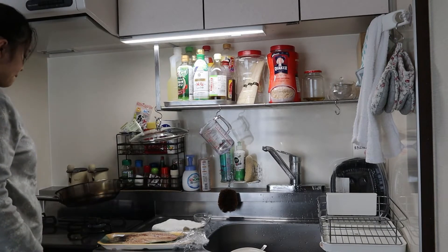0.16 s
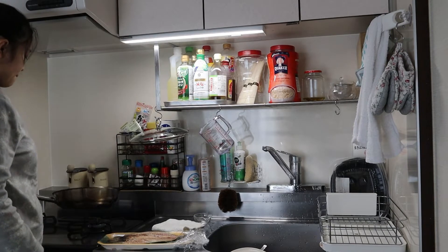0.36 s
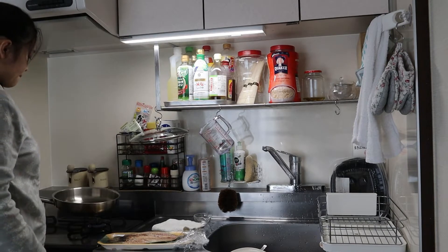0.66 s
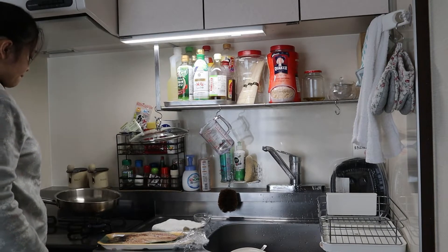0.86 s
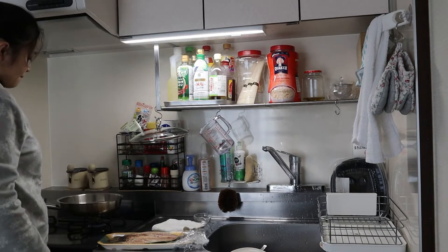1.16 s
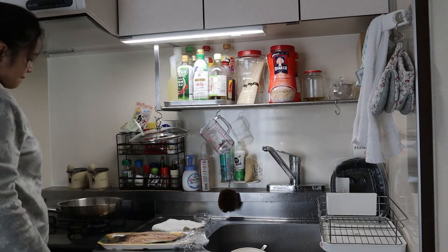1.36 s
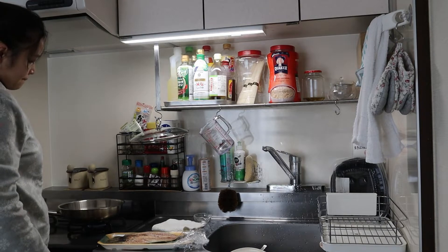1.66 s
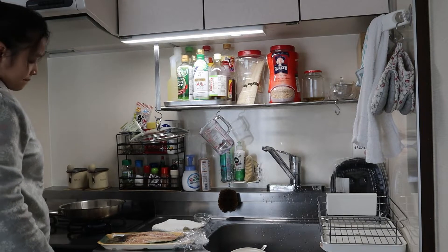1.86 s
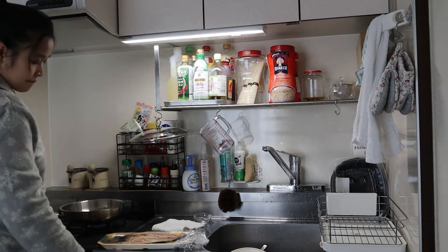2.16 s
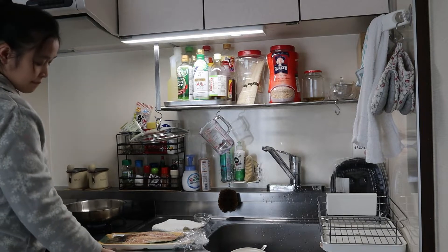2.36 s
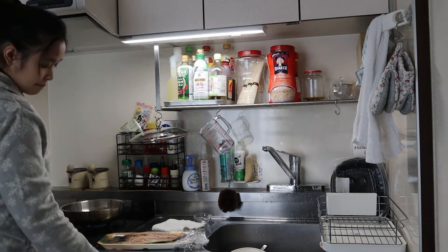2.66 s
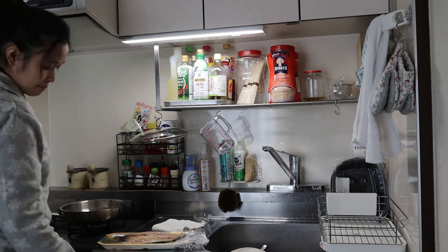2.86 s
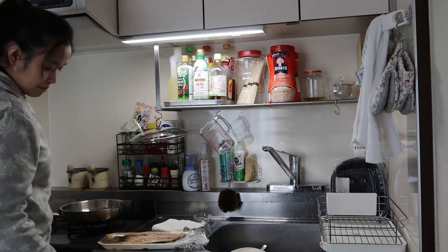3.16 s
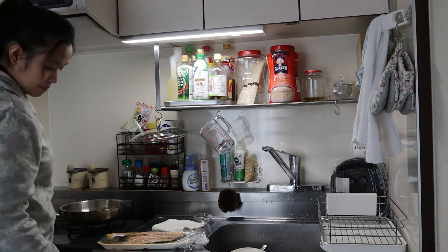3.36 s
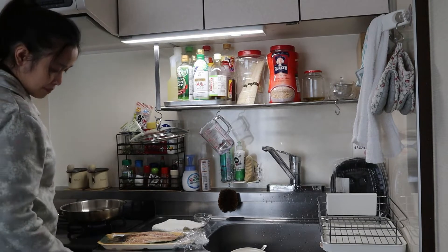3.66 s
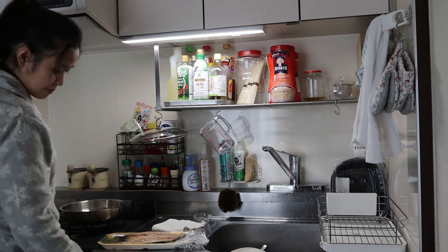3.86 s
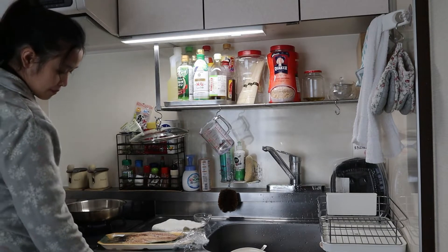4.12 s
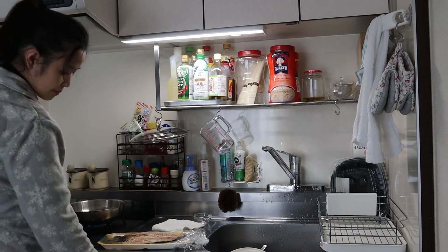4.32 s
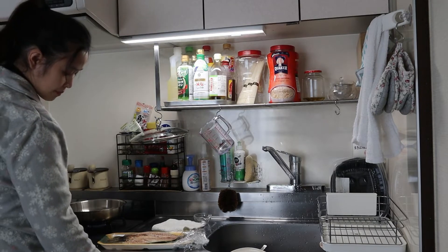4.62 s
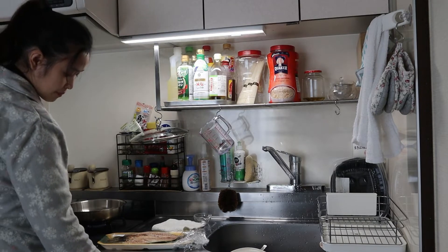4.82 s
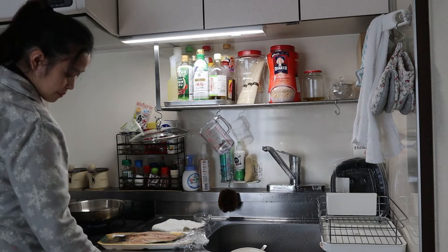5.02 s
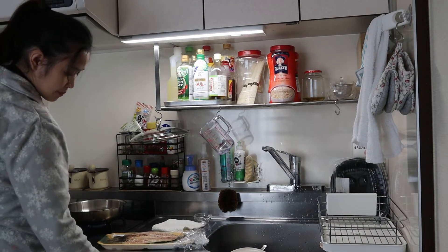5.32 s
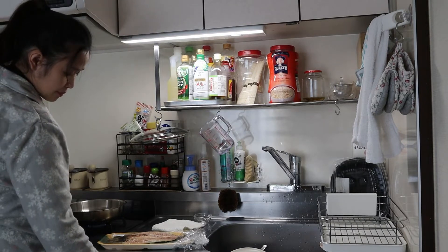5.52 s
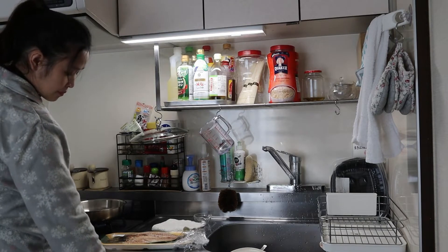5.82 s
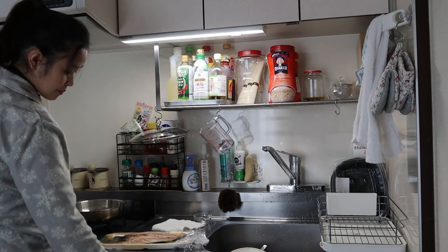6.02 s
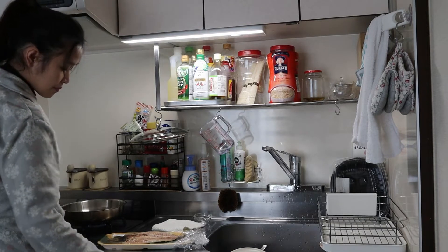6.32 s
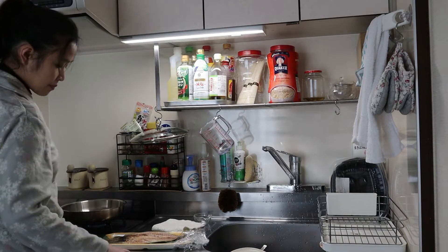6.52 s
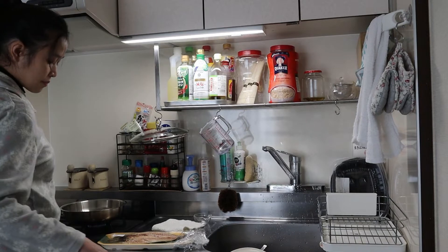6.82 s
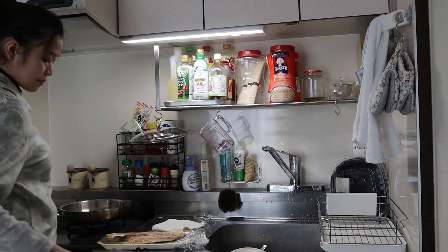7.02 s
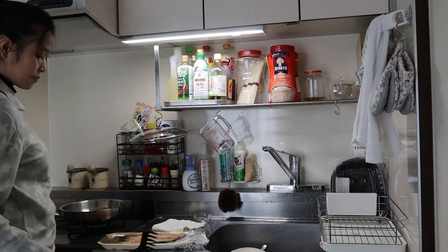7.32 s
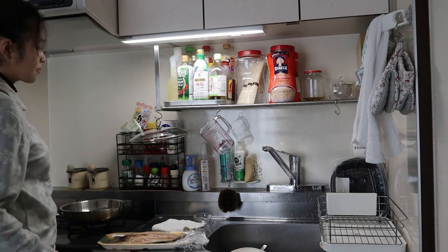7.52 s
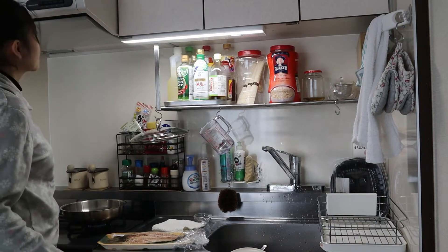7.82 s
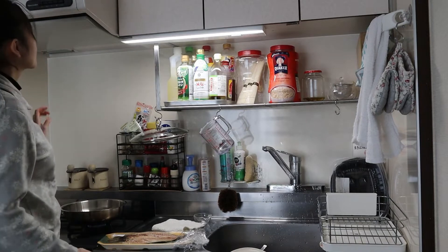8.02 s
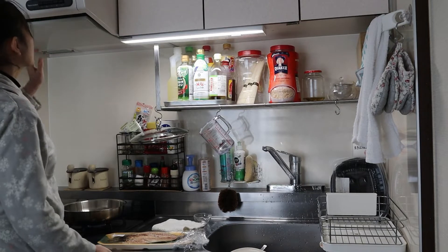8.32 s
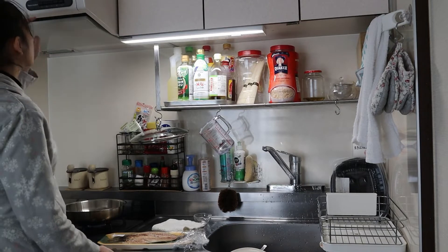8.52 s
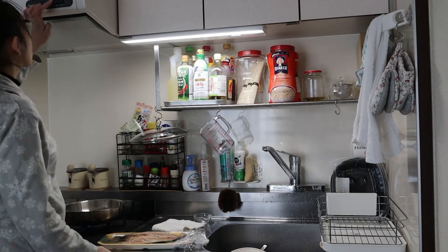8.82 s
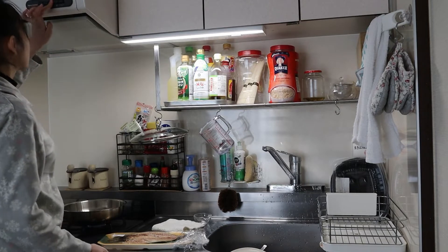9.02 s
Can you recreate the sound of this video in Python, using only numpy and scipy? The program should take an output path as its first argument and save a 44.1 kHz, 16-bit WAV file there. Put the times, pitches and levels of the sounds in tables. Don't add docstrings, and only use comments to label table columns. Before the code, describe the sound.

In a small kitchen, a steel pan clangs onto the hob, a drawer rolls open, utensils clatter about, and the drawer thumps shut.

```python
import sys
import numpy as np
from scipy import signal
from scipy.fft import rfft, irfft, next_fast_len
from scipy.io import wavfile
from scipy.ndimage import uniform_filter1d

SR = 44100
rng = np.random.default_rng(int(sys.argv[2]) if len(sys.argv) > 2 else 0)


def wav_record(signal):
    frames = np.transpose(np.atleast_2d(signal))
    bounded = np.clip(frames, -1, 1)
    quanta = np.round(bounded * 32767).astype(np.int16)
    wavfile.write(sys.argv[1], SR, quanta)


def undo_db(level):
    steps = np.asarray(level, float) / 20
    return 10 ** steps


N = 404838


def colour(x, points, turn=1):
    hz, db = np.transpose(points)
    size = next_fast_len(len(x))
    f = np.maximum(np.arange(size // 2 + 1) * SR / size, 1)
    response = undo_db(np.interp(np.log(f), np.log(np.maximum(hz, 1)), db))
    return irfft(turn * rfft(x, size) * response, size)[:len(x)]


def unit(x):
    return x / np.sqrt(np.mean(x ** 2))


def band(x, lo_hz, hi_hz):
    low_side = signal.butter(2, lo_hz, "high", fs=SR, output="sos")
    high_side = signal.butter(3, hi_hz, fs=SR, output="sos")
    return signal.sosfilt(np.vstack([low_side, high_side]), x) * np.sqrt(SR / 2 / (hi_hz - lo_hz))


def resonate(x, hz, t60):
    r, w = np.exp(-np.log(1000) / (t60 * SR)), 2 * np.pi * hz / SR
    return np.sin(w) * signal.lfilter([1], [1, -2 * r * np.cos(w), r * r], x)


def walk(rate_hz):
    k = int(SR / rate_hz)
    held = np.repeat(rng.standard_normal(N // k + 1), k)
    return uniform_filter1d(uniform_filter1d(held, k), k)[:N]


def grit(rate_hz, spread_db):
    size_db = spread_db * np.minimum(rng.exponential(size=N), 3)
    clicks = rng.random(N) < rate_hz / SR
    return unit(clicks * rng.choice([-1, 1], N) * undo_db(size_db))


def gain(spans, column):
    t = np.arange(N) / SR
    total = sum(undo_db(np.interp(t, s[:, 0], s[:, column], -120, -120)) for s in map(np.array, spans))
    return uniform_filter1d(total, size=441)


def swells(events, rise_db_s, fall_db_s):
    t = np.arange(0, N + 64, 64) / SR
    slow = 0
    for s, db, hold in events:
        early, late = np.maximum(s - t, 0), np.maximum(t - s - hold, 0)
        slow = slow + undo_db(db - rise_db_s * early - fall_db_s * late)
    return np.interp(np.arange(N) / SR, t, slow)


BODIES = ["pan", "hob", "cutlery", "ladle", "tools", "tray", "cabinet", "latch", "landing", "slam"]
BODY_RING_DB = (-11.5, -18.5, -15.5, -17, -21, -21, -8, -16.5, -11, -10)
# (thud [dB], knock [dB], edge [dB])
BODY_COLOUR_DB = [(-7, -4, -17.5), (-23, -14, -16), (-0.5, -1.5, -6.5), (-3, -1.5, -11.5), (-6.5, -1, -10),
                  (-19.5, -2, -30), (8, 4.5, -20), (13.5, -0.5, -4.5), (-18, -5.5, -14.5), (11, 2, -10)]
# (low edge [Hz], high edge [Hz])
CONTACT_BANDS = [(1460, 3070), (140, 412), (370, 1320), (4300, 10600)]
# (crack [dB], thud [dB], knock [dB], edge [dB])
CONTACT_DB = (-7.5, -5, -6, -4.5)
# (crack [dB/dB], thud [dB/dB], knock [dB/dB], edge [dB/dB])
HEFT_LIFT = (-0.073, 0.86, 0.24, -0.098)


def struck(blows, modes, body):
    which = BODIES.index(body)
    chatter_db, spot_db = -23.5, 2.0
    pair_width, pair_db, pair_ring = 0.005, -4.5, 1.06
    start = int(blows[0][0] * SR) - 200
    force = np.zeros((4, int(blows[-1][0] * SR) - start + 3 * SR // 4))
    touch = np.zeros_like(force)
    t = np.arange(SR // 2) / SR
    for s, db, heft_db, t60, knock_db in blows:
        attack = 1 - np.exp(-t / (0.075 * t60))
        fade = attack * np.exp(-np.log(1000) * t / np.clip(t60, 0.003, 0.3))
        material_db = np.array((0, *BODY_COLOUR_DB[which])) + CONTACT_DB
        level = undo_db(db + heft_db * np.array(HEFT_LIFT) + material_db + (0, 0, knock_db, 0))
        at = int(s * SR) - start
        force[:, at:at + SR // 2] += level[:, None] * fade
        touch[:, at + 44] = level * min(1, 0.1 / t60)
    force = force * rng.standard_normal(force.shape)
    contact = sum(band(f, *edges) for f, edges in zip(force, CONTACT_BANDS))

    ring, at = 0, np.flatnonzero(touch[0])
    for hz, db, t60 in modes:
        register = 1 if hz < 400 else 2 if hz < 1500 else 0 if hz < 5000 else 3
        push = undo_db(db + chatter_db) * force[register]
        spot = spot_db * rng.standard_normal(size=30)[:len(at)]
        push[at] += touch[register, at] * undo_db(db + spot)
        pair_hz = hz * (1 + pair_width * rng.uniform(0.492, 1))
        ring = ring + resonate(push, hz, t60) + undo_db(pair_db) * resonate(push, pair_hz, pair_ring * t60)
    sound = contact + undo_db(BODY_RING_DB[which]) * ring
    return np.concatenate([np.zeros(start), sound, np.zeros(N)])[:N]


# (frequency [Hz], density [dB per Hz])
HISS_SPECTRUM = [(12, -51.5), (20, -33), (59, -7.5), (111, -12), (183, -11.5), (286, -16), (319, -14),
                 (367, -17.5), (511, -21), (620, -18.5), (940, -20), (9630, -42), (15000, -54)]


def hiss():
    return unit(colour(rng.standard_normal(N), HISS_SPECTRUM)) * undo_db(-54 + 0.36 * walk(4.17))


# (frequency [Hz], rms level [dB])
MOTOR_LINES = [(59.2, -61.5), (102.3, -64.5), (2767, -69.5)]


def hum():
    turns = np.cumsum(1 + 0.0027 * walk(1.8)) / SR
    return sum(np.sqrt(2) * undo_db(db - 4.0) * np.sin(2 * np.pi * hz * turns) for hz, db in MOTOR_LINES)


# (time [s], crack [dB], heft [dB], contact t60 [s], extra knock [dB])
CABINET_BUMPS = [(0.6091, -47.5, -2, 0.028, -8), (2.347, -47, 5.5, 0.087, 5), (2.3645, -31, -16, 0.025, 0),
                 (2.4914, -42, 21, 0.014, -6), (2.7411, -37, 7, 0.022, 7), (2.7814, -53, -22, 0.063, 5),
                 (3.669, -51, 3.5, 0.036, -1), (3.9281, -45, -6, 0.021, 3), (7.299, -69, 20, 0.048, -9),
                 (7.6211, -38, -33, 0.041, -3), (7.8693, -26, 3, 0.03, -0.5),
                 (8.0189, -24.5, -3, 0.014, -11)]
# (frequency [Hz], level [dB], t60 [s])
CABINET_MODES = [(82, -15, 0.27), (103, -2.5, 0.12), (163.6, -2, 0.26), (215.3, -6, 0.22),
                 (233, -23, 0.039), (274, -4.5, 0.05), (326, -26, 0.084), (679, 0.5, 0.062)]


def cabinet():
    return struck(CABINET_BUMPS, CABINET_MODES, "cabinet")


# (frequency [Hz], t60 [s], level [dB])
ROOM_DECAY = [(59.5, 0.52, 3.5), (82.4, 0.25, 3), (123.7, 1, -1), (208, 0.37, 2), (1000, 0.46, 4),
              (3700, 0.44, 3.5), (10600, 0.14, -1.5)]


def kitchen():
    t, out = np.arange(int(0.9 * SR)) / SR, 0
    room_hz, room_t60, room_db = np.transpose(ROOM_DECAY)
    for hz in 45 * 2 ** np.arange(0, 9, 0.5):
        t60 = np.interp(np.log(hz), np.log(room_hz), room_t60)
        db = np.interp(np.log(hz), np.log(room_hz), room_db)
        share = [(hz / 1.6, -60), (hz / 1.41, -14), (hz / 1.19, -3), (hz, 0),
                 (hz * 1.19, -3), (hz * 1.41, -14), (hz * 1.6, -60)]
        noise = colour(rng.standard_normal(len(t)), share)
        out = out + undo_db(db) * noise * np.exp(-np.log(1000) * t / t60) / np.sqrt(t60)
    out = out * np.clip(t / 0.0028, 0, 1)
    return out / np.sqrt(np.sum(out ** 2))


# (time [s], crack [dB], heft [dB], contact t60 [s], extra knock [dB])
PAN_KNOCKS = [
    (1.4505, -19, -12, 0.023, -22),
    (1.4585, -19.5, -10.5, 0.0052, -16.5),
    (1.52, -35, 2.5, 0.084, 5),
    (1.59, -33, 9, 0.1, 0.5),
    (1.65, -38.5, 8.5, 0.13, -1.5),
]
# (frequency [Hz], level [dB], t60 [s])
PAN_MODES = [(208, -10, 0.55), (328, -6, .26), (710, -15, 0.44), (860, -12, 0.44), (1160, 3.5, 0.12),
             (1560, -18, .2), (2305, 3.5, 0.16), (3230, -7, .22), (3530, -8, .27), (4090, 1, 0.19),
             (4657, 1, 0.2), (5809, 4.5, 0.14), (7060, 5.5, 0.13), (8300, -24, .1)]


def pan():
    return struck(PAN_KNOCKS, PAN_MODES, "pan")


# (time [s], length [s], frequency [Hz], level [dB], glide [share of pitch])
SQUEAK_EVENTS = [
    (1.5, .2, 205, -45, 0),
    (2.36, .047, 1950, -58, 0),
    (2.74, .074, 1480, -58, 0),
    (5.72, .085, 975, -38, -.03),
    (5.72, .07, 1920, -52, -.02),
    (5.97, .035, 1250, -23, -.35),
    (6.38, .07, 1900, -47, 0),
]


def squeaks():
    out, wobble = np.zeros(N), 1 + 0.01 * walk(90)
    for s, length, hz, db, glide in SQUEAK_EVENTS:
        at = slice(int(s * SR), int(s * SR) + int(length * SR))
        size = len(out[at])
        cycles = hz * np.cumsum(wobble[at] + np.linspace(0, glide, size)) / SR
        out[at] += undo_db(db) * np.hanning(size) * np.sin(2 * np.pi * cycles)
    return out


# (time [s], level [dB], hold [s])
SLIDES = [(1.56, -46, 0.2), (1.938, -39, 0.18), (3.85, -51, 0.053), (4.128, -27.5, 0.012),
          (4.562, -44.5, 0.24), (4.95, -37.5, 0.052), (5.56, -43, .03), (5.82, -29.5, 0.073),
          (5.995, -27.5, 0.015), (6.218, -25.5, 0.0038), (6.476, -39.5, 0.0036), (8.45, -45, 0.096),
          (8.9, -50.5, 0.39)]
# (frequency [Hz], density [dB per Hz])
SLIDE_SPECTRUM = [(59, -48), (100, -12), (600, -4), (952, -6.5), (1400, -29), (1920, -16), (3000, -26.5),
                  (14000, -40.5)]


def rustle():
    ticks = unit(colour(grit(4000, spread_db=-4.0), SLIDE_SPECTRUM))
    return undo_db(-9.5) * ticks * undo_db(3.45 * walk(14)) * swells(SLIDES, rise_db_s=236.5, fall_db_s=166.5)


# (time [s], crack [dB], heft [dB], contact t60 [s], extra knock [dB])
PAN_LANDING = [
    (1.7579, -11.5, -9, 0.014, -1),
    (1.765, -8, 0, 0.012, 0),
    (1.799, -15, 13.5, 0.056, 2.5),
    (1.83, -22, 10.5, 0.026, -2),
]
# (frequency [Hz], level [dB], t60 [s])
LANDING_MODES = [(350, 5.5, 0.15), (1246, -2.5, 0.049), (1413, -14.5, 0.12), (2283, -5, 0.081),
                 (3140, -12, 0.22), (3280, 1, .14), (3670, -10, .2), (4190, 1.5, 0.16), (4450, -15.5, .3),
                 (4620, -2, 0.12), (5600, 13.5, 0.033), (6460, 1.5, 0.12), (6970, -1.5, .12),
                 (8040, -3, 0.11)]


def landing():
    return struck(PAN_LANDING, LANDING_MODES, "landing")


# (time [s], crack [dB], heft [dB], contact t60 [s], extra knock [dB])
HOB_KNOCKS = [
    (1.928, -14, -26.5, 0.055, -1),
    (1.94, 5.5, -9, 0.0051, 0.94),
    (1.945, -18.5, -6, 0.011, 0.89),
    (1.972, -18, -13, 0.097, -1),
    (2.046, -13, 5, 0.035, 0),
    (2.1, -21.5, -6, 0.025, 0.9),
]
# (frequency [Hz], level [dB], t60 [s])
HOB_MODES = [(311, 8.5, 0.14), (934, 12, 0.018), (2266, -20.5, 0.074), (5780, 5, 0.055), (3284, -2, 0.22),
             (3363, -2, 0.18), (3630, -9.5, 0.21), (4100, -6.5, 0.078), (4475, -14, 1.05),
             (4640, -7.5, 0.18), (6100, 6.5, .17), (7080, 1.5, 0.12), (7970, 3, 0.13), (12230, -0.5, 0.27)]


def hob():
    return struck(HOB_KNOCKS, HOB_MODES, "hob")


# (time [s], rumble level [dB])
DRAWER_ROLLS = [
    [(2.33, -24.5), (2.354, -38.5), (2.47, -33.5), (2.502, -26.5), (2.756, -26.5), (2.774, -25),
     (3.02, -32.5), (3.2, -59)],
    [(7.5, -52), (7.58, -46.5), (7.78, -27), (7.972, -25), (8.112, -32), (8.29, -34.5), (8.3, -23)],
]
# (frequency [Hz], width [Hz], level [dB])
DRAWER_MODES = [(81, 5, 8.5), (119, 9.8, 7), (161, 79, 11), (198, 48, -4), (220, 15, -1), (283.7, 6.3, -3),
                (350, 7.3, -35.5), (681, 440, -35)]
# (frequency [Hz], density [dB per Hz])
RAIL_SPECTRUM = [(240, -28), (400, 3), (471, -12), (644, -4.5), (1460, -13), (1880, -12.5), (11000, -30.5),
                 (14000, -43)]


def drawer():
    bumps = grit(270, spread_db=2.0)
    box = 0
    for hz, width_hz, db in DRAWER_MODES:
        box = box + undo_db(db) * unit(resonate(bumps, hz, 3.4 / max(width_hz, 8)))
    rails = colour(grit(9000, spread_db=4.5), RAIL_SPECTRUM) * undo_db(0.51 * walk(28))
    return (undo_db(-7) * unit(box) + undo_db(-23) * unit(rails)) * gain(DRAWER_ROLLS, column=1)


# (time [s], crack [dB], heft [dB], contact t60 [s], extra knock [dB])
CUTLERY_KNOCKS = [(2.9876, -26.5, 11, 0.022, -4.5), (3.0475, -57, 6, 0.054, -1),
                  (4.075, -14.5, -14, 0.032, -4), (4.1033, -18.5, -5, 0.072, 3), (4.132, -18, 6, .02, -2.5),
                  (4.139, -9, -3.5, 0.032, -1.5), (4.1978, -21.5, -2, 0.01, 7), (4.445, -32.5, -2, 0.2, 4),
                  (4.47, -21.5, -2, 0.038, -7), (4.478, -24, -1, 0.024, -1.5), (4.494, -24, 0, .04, -3),
                  (4.5114, -21, -1.5, 0.0079, -0.5)]
# (frequency [Hz], level [dB], t60 [s])
CUTLERY_MODES = [(207.8, -1, 0.15), (636, 0, 0.1), (863, 5.5, 0.06), (1070, -16, 0.066), (1797, -2, 0.053),
                 (2755, -9.5, 0.045), (4610, -12.5, 0.051), (9400, -13, 0.05), (10380, -1, 0.15),
                 (10890, 1.5, 0.22), (11040, -5.5, 0.26), (11300, -2, 0.14), (13050, -10, 0.26),
                 (13650, -12, 0.17)]


def cutlery():
    return struck(CUTLERY_KNOCKS, CUTLERY_MODES, "cutlery")


# (time [s], level [dB], hold [s])
BOARD_SHAKES = [(3.1, -30, 0.017), (3.65, -65, 0.0072), (4.11, -28.5, 0.0071), (4.52, -35, 0.011),
                (4.85, -29.5, 0.031), (5.37, -45, 0.081), (5.78, -34.5, 0.35), (6.33, -35, 0.015),
                (6.7, -40, 0.013), (7.16, -63, .01), (7.31, -31.5, 0.026), (7.6, -44, 0.011),
                (8.42, -38, 0.038), (8.55, -30, 0.44)]


def boards():
    rumble = band(rng.standard_normal(N), 58, 87)
    return undo_db(-15.5) * rumble * swells(BOARD_SHAKES, rise_db_s=174.5, fall_db_s=79)


# (time [s], crack [dB], heft [dB], contact t60 [s], extra knock [dB])
LADLE_KNOCKS = [
    (4.765, -29.5, 2, 0.15, 1),
    (4.8118, -25.5, 3, 0.11, -1.5),
    (4.8439, -10.5, -3.5, 0.023, 6.5),
    (4.8689, -27.5, 17, 0.028, -5),
    (4.9203, -7, -35, .02, -13),
    (4.9824, -10.5, -8, 0.022, -9),
]
# (frequency [Hz], level [dB], t60 [s])
LADLE_MODES = [(192, -15, 0.41), (395, -5.5, 0.25), (644, 1.5, 0.18), (800, -24, .2), (1098, 7, 0.028),
               (2910, -10, 0.062), (10000, -12, 0.053), (12240, -4, 0.08)]


def ladle():
    return struck(LADLE_KNOCKS, LADLE_MODES, "ladle")


# (time [s], crack [dB], heft [dB], contact t60 [s], extra knock [dB])
TOOL_KNOCKS = [(5.4785, -37, 17, 0.019, -5), (5.534, -29, 2, 0.052, 1.5), (5.552, -37, 13, 0.023, 6),
               (5.594, -52, -2, 0.023, -3), (5.651, -33.5, 2, 0.043, 12), (5.6982, -21.5, 3, 0.037, -1),
               (5.8049, -19, 12, 0.051, -2), (5.8235, -22.5, 12, 0.02, 1),
               (5.8325, -12.5, -21, 0.025, -0.5), (5.8658, -8, 2.5, 0.017, -1.5),
               (5.911, -16.5, 3, 0.033, 6.5), (5.93, -25, 10, 0.018, 3.5), (5.97, -17.5, 9, .02, 2.5),
               (5.979, -6.5, 5.5, 0.022, 3.5), (6.03, -28.5, -22, 0.02, 6),
               (6.1764, -17.5, 12.5, 0.051, -5.5), (6.22, -33, 3.5, 0.044, 12),
               (6.354, -20, -34, 0.015, -9), (6.3814, -21.5, 9, 0.0073, 1), (6.404, -24.5, 7, 0.054, 5),
               (6.445, -30, 0, .015, 2), (6.4728, -29, 7, 0.02, 6), (6.52, -64, 8, 0.034, 8)]
# (frequency [Hz], level [dB], t60 [s])
TOOL_MODES = [(216.5, -2, 0.31), (374.5, 6.5, 0.15), (562, -3.5, 0.56), (646, 5, 0.1), (806, -3, 0.11),
              (869, 3, 0.056), (976, -4.5, 0.06), (1110, -6, 0.058), (1890, -6, 0.12), (2257, -5, 0.051),
              (2730, -1.5, 0.042), (3017, -1.5, 0.073), (4330, 1, 0.04), (5680, 8.5, 0.019)]


def tools():
    return struck(TOOL_KNOCKS, TOOL_MODES, "tools")


# (time [s], crack [dB], heft [dB], contact t60 [s], extra knock [dB])
TRAY_KNOCKS = [
    (6.658, -9, -8, 0.04, -2),
    (6.671, -13, 0, .03, -2),
    (6.685, -13, 8, 0.035, -2),
    (6.71, -22, 16.5, 0.047, 1),
]
# (frequency [Hz], level [dB], t60 [s])
TRAY_MODES = [(163.6, 10, 0.31), (300, 9, 0.09), (1172, 1, 0.16), (1514, 13, 0.054), (1383, 8, 0.09),
              (1640, 7, 0.16), (2040, 4.5, 0.2), (2400, -6, .12), (2630, -4, 0.34), (2725, -4, 0.8),
              (3176, -7.5, 0.37), (3550, -10, 0.21), (3957, -15, 0.22), (4242, -20.5, 0.15)]


def tray():
    return struck(TRAY_KNOCKS, TRAY_MODES, "tray")


# (time [s], crack [dB], heft [dB], contact t60 [s], extra knock [dB])
SLAM_KNOCKS = [
    (8.321, -21.5, 9.2, 0.04, -1),
    (8.343, -36, 6.9, 0.023, 0),
    (8.356, -22.5, 2.7, 0.01, -5.5),
    (8.372, -25.5, 3.2, 0.025, 3.5),
    (8.39, -33, 4.7, 0.016, 0.5),
]
# (frequency [Hz], level [dB], t60 [s])
SLAM_MODES = [(66, -8, .4), (93, 1, 0.26), (169.5, -5, 0.14), (225.4, 1.5, 0.1), (297, -9, .12),
              (520.6, -2.5, 0.16), (570, -3, 0.13), (689, 3.5, 0.094), (843, -14.5, 0.15)]


def slam():
    return struck(SLAM_KNOCKS, SLAM_MODES, "slam")


# (time [s], crack [dB], heft [dB], contact t60 [s], extra knock [dB])
LATCH_CLICKS = [
    (8.7475, -37, -9, 0.027, 0.87),
    (8.796, -22.5, -16.5, 0.093, 0.85),
    (9.0589, -47, -12, 0.12, 0.86),
]
# (frequency [Hz], level [dB], t60 [s])
LATCH_MODES = [(112.3, 8, 0.71), (860, 10, 0.051), (1296, -10, 0.4), (1680, -8, 0.17), (2670, -12, 0.25),
               (3840, -18, 0.1), (6400, -26, 0.11)]


def latch():
    return struck(LATCH_CLICKS, LATCH_MODES, "latch")


# (frequency [Hz], side minus mid [dB])
PORT_DIFFERENCE = [(60, -53), (125, -28), (250, -13.5), (500, -5.5), (1000, -2), (2000, 2), (4000, 5),
                   (8000, 6.5), (14000, 2.5)]


def scene():
    dry = cabinet() + pan() + squeaks() + rustle() + landing() + hob() + drawer() + cutlery()
    dry = dry + boards() + ladle() + tools() + tray() + slam() + latch()
    dry = signal.sosfilt(signal.butter(2, 48, "high", fs=SR, output="sos"), dry)

    def port_sum(front_db):
        room = undo_db(3) * signal.fftconvolve(dry, kitchen())[:N]
        return undo_db(front_db) * (dry + room) + hiss() + hum()

    mid = port_sum(0)
    side = port_sum(-1.3)
    side = colour(side, PORT_DIFFERENCE, turn=1j - 0.25)
    return np.array([mid + side, mid - side])


def roll_off(x):
    return signal.sosfilt(signal.butter(12, 15480, fs=SR, output="sos"), x)


def record(dry):
    clipped = np.clip(dry, -1, 1)
    mix = signal.sosfilt(signal.ellip(8, 0.2, 60, 15600, fs=SR, output="sos"), clipped)
    return roll_off(mix)


dry = scene()
out = record(dry)
wav_record(out)
```